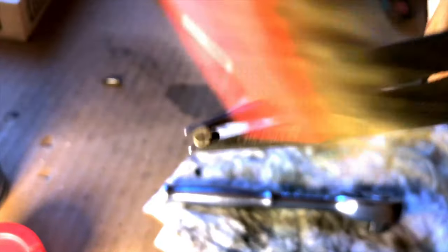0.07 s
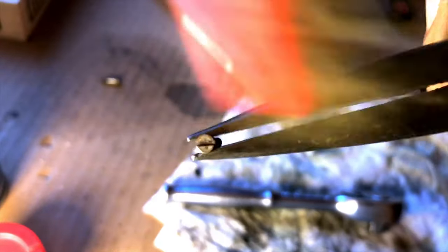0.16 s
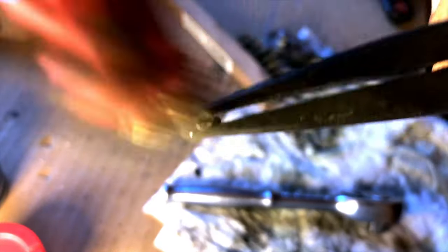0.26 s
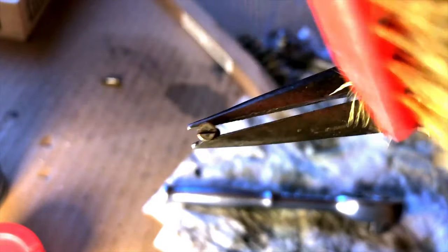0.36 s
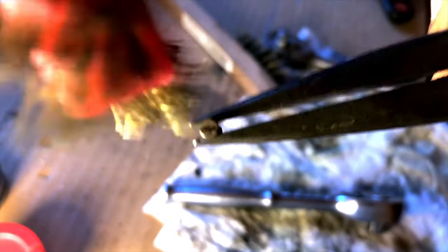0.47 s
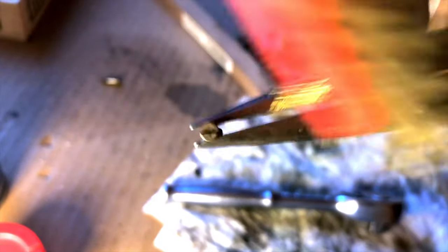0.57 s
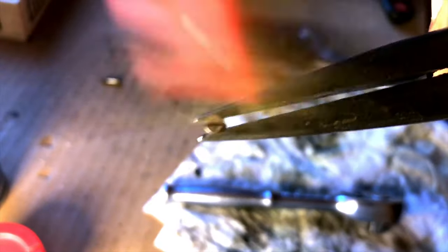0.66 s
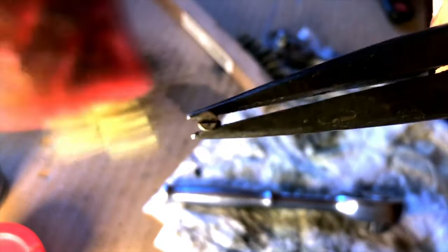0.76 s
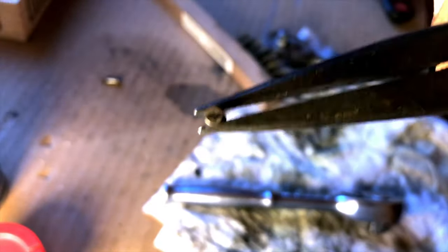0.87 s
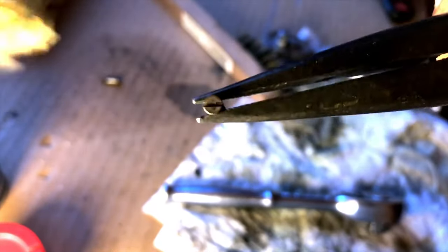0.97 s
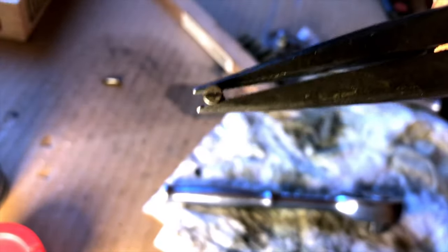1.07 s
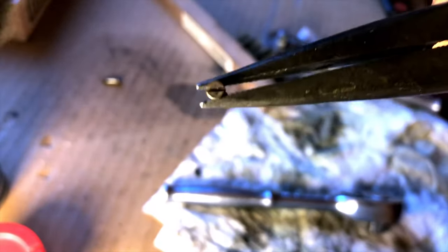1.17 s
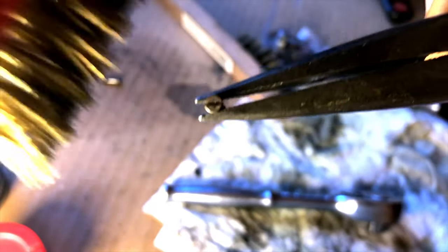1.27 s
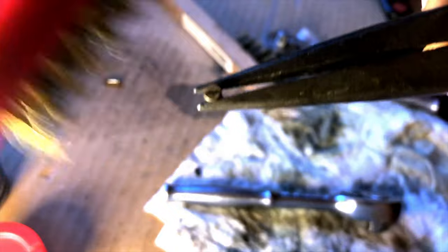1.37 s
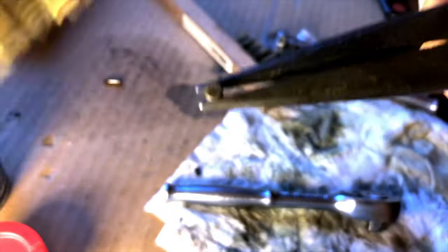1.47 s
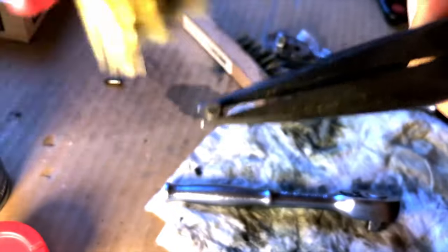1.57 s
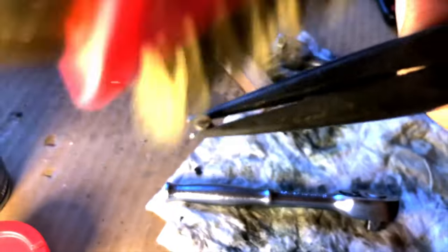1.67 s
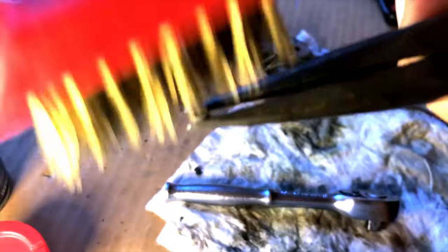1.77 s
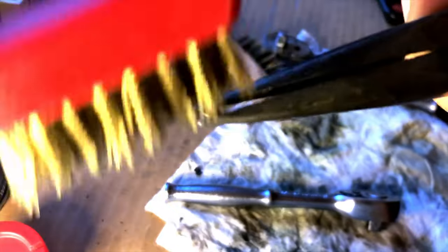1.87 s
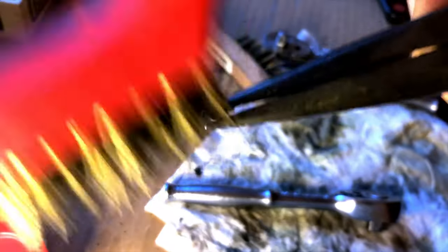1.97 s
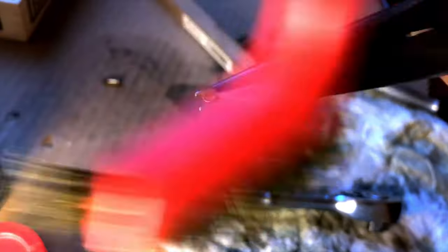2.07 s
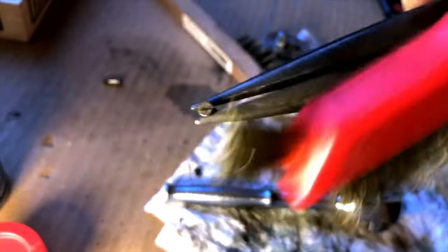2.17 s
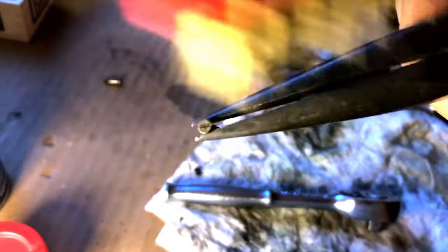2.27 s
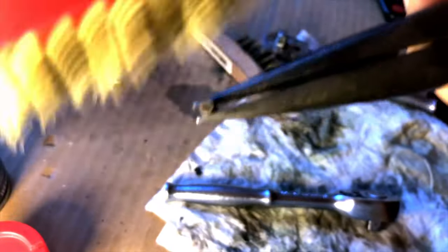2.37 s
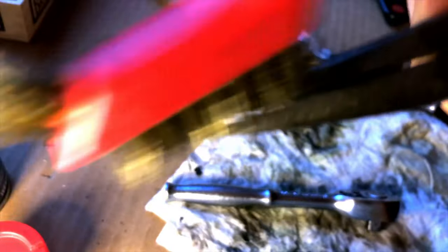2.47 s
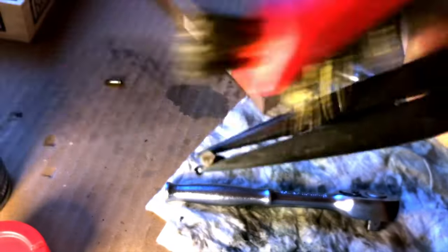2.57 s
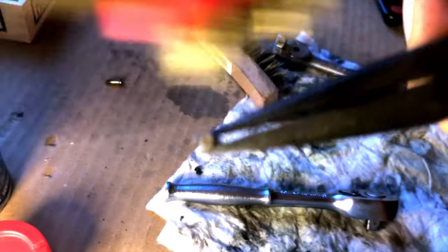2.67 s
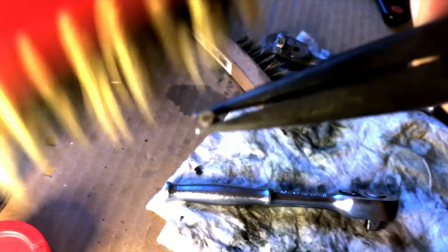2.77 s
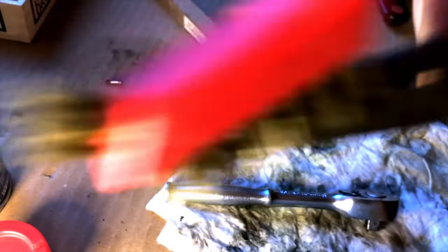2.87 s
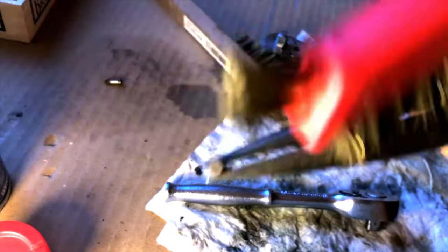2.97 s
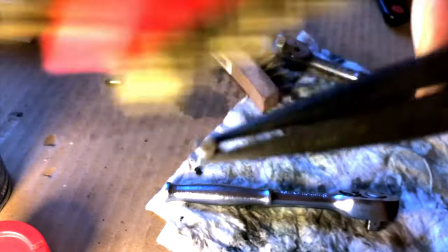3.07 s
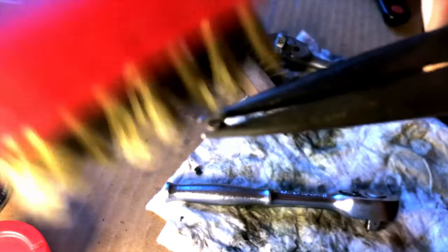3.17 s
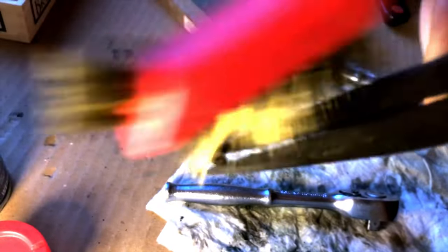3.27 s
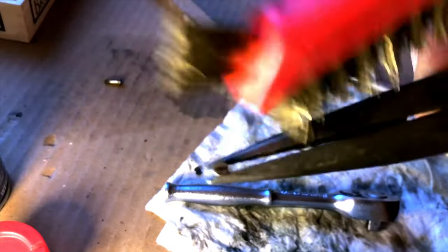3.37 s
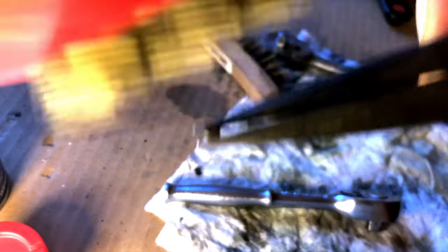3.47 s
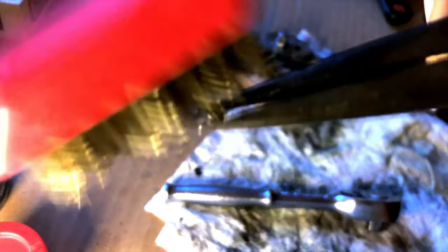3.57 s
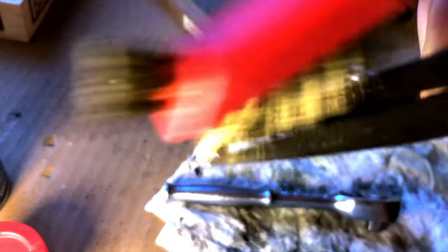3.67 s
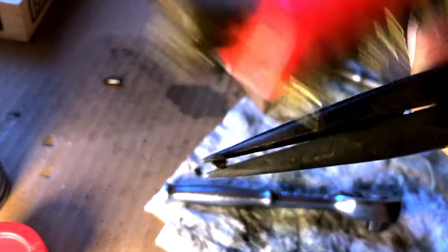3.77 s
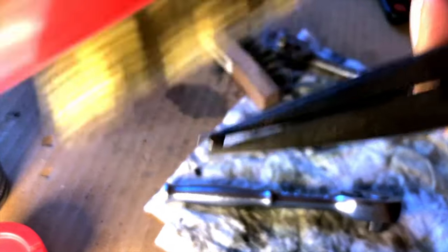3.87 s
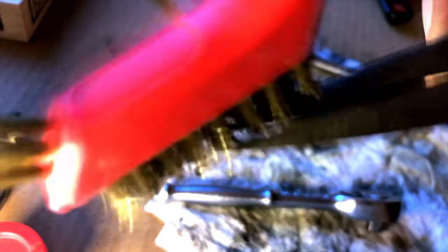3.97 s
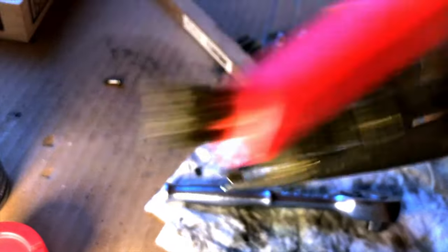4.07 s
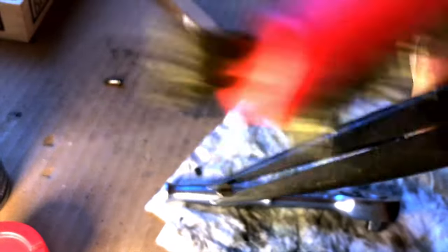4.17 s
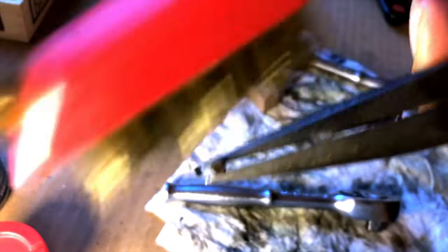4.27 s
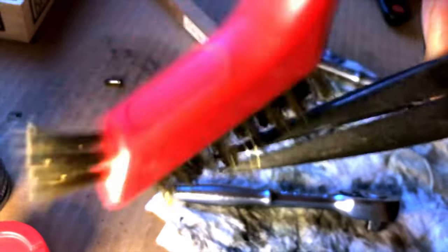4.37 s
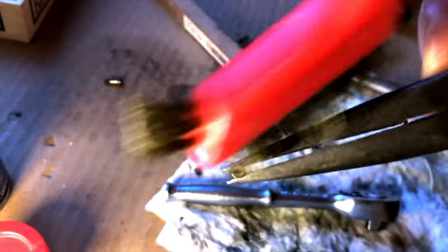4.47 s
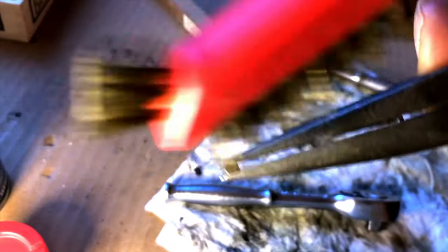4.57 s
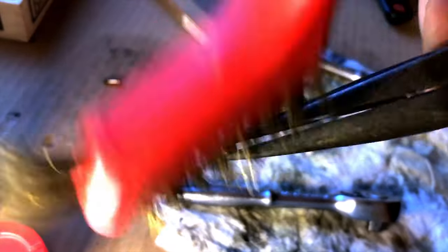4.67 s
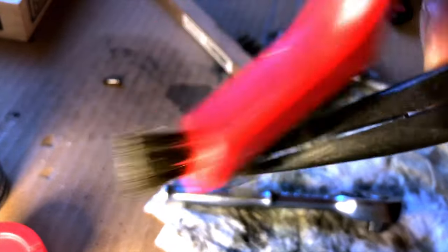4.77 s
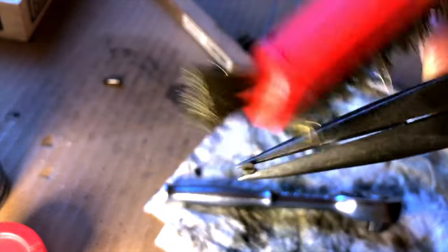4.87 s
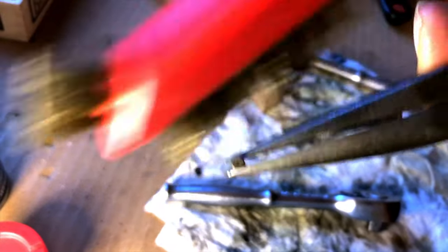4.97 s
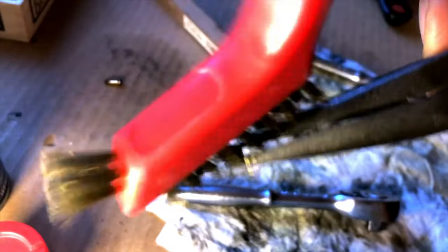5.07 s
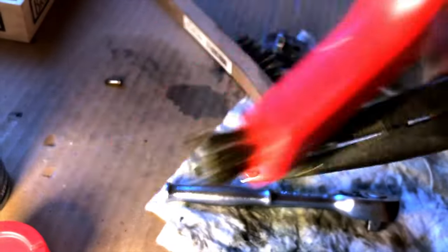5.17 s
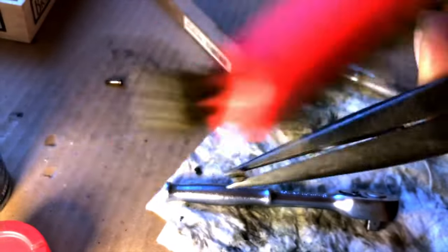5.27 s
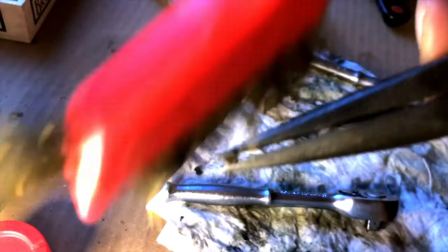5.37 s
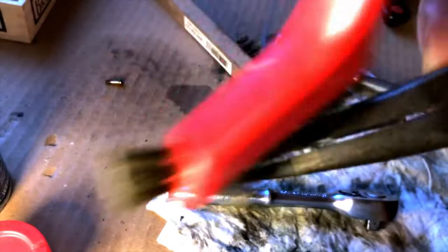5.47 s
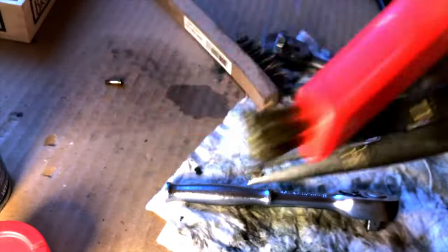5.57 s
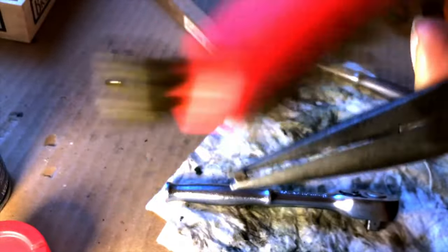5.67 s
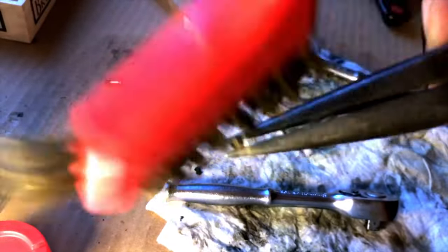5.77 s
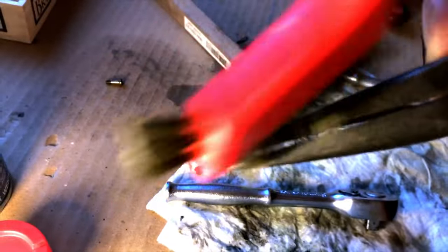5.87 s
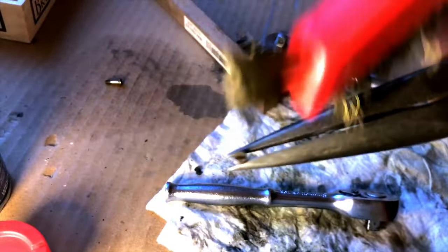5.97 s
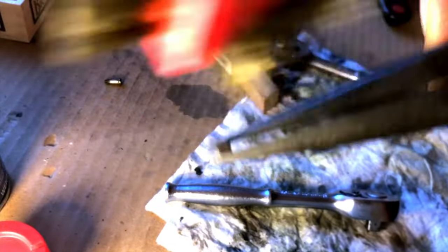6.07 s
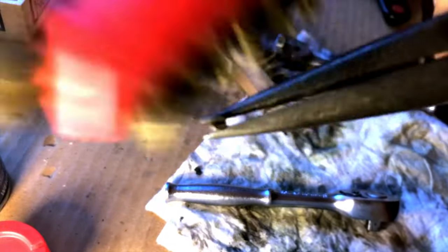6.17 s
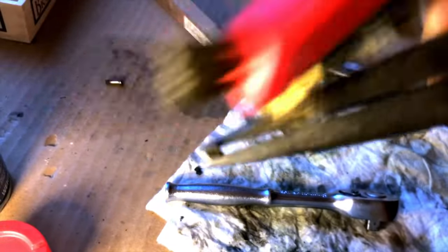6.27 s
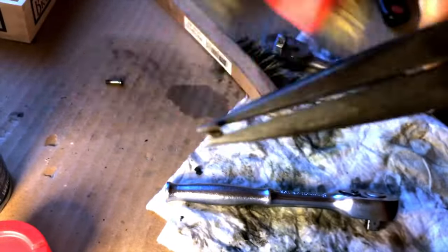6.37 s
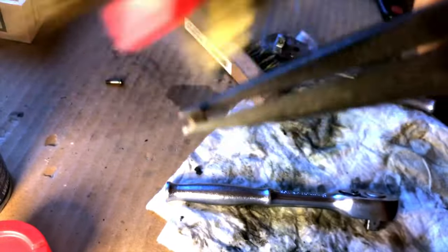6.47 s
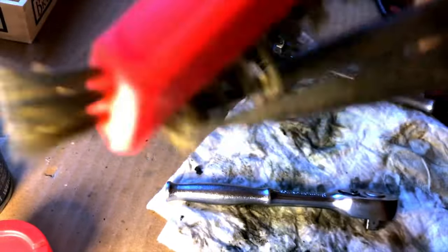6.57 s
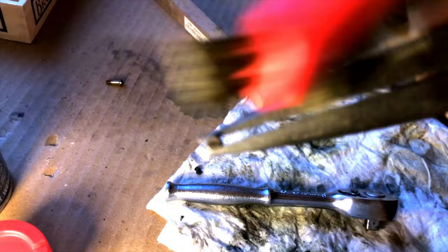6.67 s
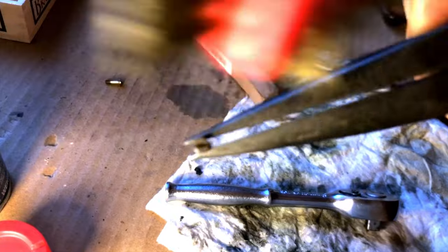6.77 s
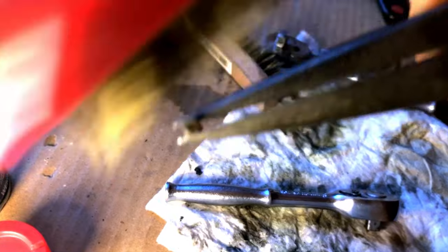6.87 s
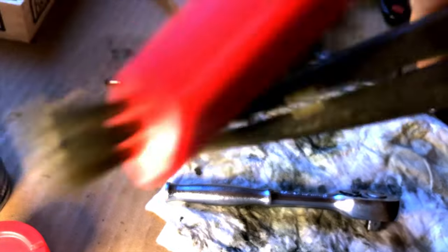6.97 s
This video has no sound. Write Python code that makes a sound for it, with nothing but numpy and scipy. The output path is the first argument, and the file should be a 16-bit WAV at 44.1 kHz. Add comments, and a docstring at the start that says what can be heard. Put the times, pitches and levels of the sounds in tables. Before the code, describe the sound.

Three short, dull-thudding wire scratches come about a quarter second apart. After a second of near quiet with soft swishes, the brush's hard head cracks against the pliers, slides briefly and bumps off. Then thirteen crisp, bright strokes follow at nearly three per second, with stray bristles flicking and pliers ringing slightly. Close dry microphone, little echo, weak low room rumble.

```python
"""Scratchy swipes of a small brass wire brush across a screw held in pliers, close by in a quiet workshop. Each
swipe is a slap of wire ticks, then a drag of ticks and pings; screw and pliers colour both, the hand thuds.
Stray tufts flick, and after a long rebound the brush lands a second time. The plastic brush head knocks on the
pliers (decaying modes), scrapes along them (filtered ticks) and bumps softly. Bristles rustle in faint swishes
over a low room rumble of filtered noise and a weak hum."""
import sys
import numpy as np
from scipy import signal
from scipy.fft import rfft, irfft, next_fast_len
from scipy.io import wavfile
from scipy.ndimage import uniform_filter1d, map_coordinates

SR = 44100
rng = np.random.default_rng(int(sys.argv[2]) if len(sys.argv) > 2 else 0)


def put_to_file(sound):
    """Save the sound as 16-bit audio at rate SR, in the file named by the first command-line argument."""
    columns = np.atleast_2d(sound).T  # one column per channel
    safe = np.clip(columns, -1, 1)
    whole_steps = np.round(safe * 32767)
    wavfile.write(sys.argv[1], SR, whole_steps.astype(np.int16))


N = 309582

# The brush head hits the pliers, then bumps softly as it slips off.
# Each row: start in seconds, level in dB, brightness in dB per octave above 2 kHz.
HEAD_KNOCKS = [(2.067, 0, -0.5), (2.1712, -23.5, -11)]


def amp(db):
    """Decibels to a linear factor."""
    return 10 ** (np.asarray(db) / 20)


def unit(x):
    """Scale a signal to rms 1."""
    return x / np.sqrt(np.mean(x ** 2) + 1e-20)


def clock(length):
    """Sample times over a length in seconds."""
    return np.arange(max(int(length * SR), 8)) / SR


def along(points, hz):
    """Interpolate (Hz, value) points on a log frequency axis."""
    point_hz, values = np.transpose(points)
    return np.interp(np.log(hz + 1), np.log(point_hz), values)


def brighter(hz, tilt_db):
    """A slope in dB per octave above 2 kHz, flat below."""
    return tilt_db * np.log2(np.maximum(hz, 2000) / 2000)


def wobble(size, rate):
    """A smooth random curve, rate knots a second."""
    knots = rng.standard_normal(int(size * rate / SR) + 4)
    return map_coordinates(knots, [np.arange(size) * rate / SR])


def add(track, s, x):
    """Mix x into the track at s seconds."""
    part = track[max(round(s * SR), 0):][:len(x)]
    part += x[:len(part)]


def colour(x, gain_db):
    """Causal minimum-phase filter with a given dB curve of frequency; keeps the energy of x."""
    size = 2 * next_fast_len(len(x) // 2 + 2048)
    cepstrum = irfft(np.log(amp(gain_db(np.fft.rfftfreq(size, 1 / SR)))))
    # folding the cepstrum onto positive times makes the filter causal
    cepstrum[1:size // 2] *= 2
    cepstrum[size // 2 + 1:] = 0
    y = irfft(rfft(x, size) * np.exp(rfft(cepstrum)))[:len(x)]
    return unit(y) * np.sqrt(np.mean(x ** 2))


def resonance(centre_hz, width_hz):
    """The dB curve of one damped mode."""
    def curve(f):
        response = f * width_hz / (centre_hz ** 2 - f ** 2 + 1j * f * width_hz)
        return 20 * np.log10(np.abs(response) + 1e-6)
    return curve


def ticks(size, rate, spread_db):
    """Many tiny contacts at random moments and of random strength, rms 1."""
    hits = np.sqrt(rng.poisson(rate / SR, size))
    strength = amp(spread_db * rng.standard_normal(size))
    return unit(hits * rng.choice([-1, 1], size) * strength)


def swipes():
    """The first bristles slap the screw and rebound; then the brush drags across it and pushes the hand."""
    # Each row: start in seconds, slap level in dB, ring of the pliers in dB relative to the slap,
    # rebound in seconds, end of pressing and end of swipe in seconds after the start, drag level in dB,
    # drag brightness in dB per octave, thud level in dB. Levels are faders ahead of each sound's own trims.
    strokes = [(0.07, -33, -9, .005, 0.048, 0.076, -38, -1, -33),
               (0.3051, -28, -14.5, 0.0028, 0.047, 0.078, -37, 0, -35),
               (0.538, -29, -27, .005, 0.03, 0.1, -37.5, -0.5, -38.5),
               (2.444, -30, -7, 0.01, 0.081, 0.1671, -41, 1.5, -50.5),
               (2.848, -26, 1, 0.0084, 0.0582, 0.13, -39.5, -1, -46),
               (3.224, -28, -4.5, 0.0087, .1, .14, -40.5, 1.3, -51),
               (3.588, -30.5, -0.5, 0.0063, 0.12, 0.17, -38.5, 2.5, -49),
               (3.9797, -19.5, -1.5, 0.0065, 0.095, 0.15, -38, 1.2, -42),
               (4.385, -29.5, -5, .022, .095, 0.12, -40.5, 3, -59),
               (4.7089, -24, -2, .003, .11, 0.1614, -41, 1.3, -38),
               (5.0783, -21.5, -8, .008, 0.091, .16, -38.5, 2.5, -40),
               (5.4365, -21.5, -11, .008, 0.097, .18, -39.5, 2, -40.5),
               (5.8105, -23.5, -12, 0.00674, 0.098, 0.18, -40, 2.5, -45),
               (6.204, -32, -13, 0.0067, 0.14, 0.17, -44.5, 2.5, -53),
               (6.5695, -25, -5.5, .022, 0.068, 0.15, -40, 3, -43.5),
               (6.939, -23.5, -6.5, 0.0086, 0.092, 0.16, -39.5, 3.5, -38.5)]
    slap_s, slap_tilt_db = .005, 1.12  # the slap is brighter than the drag by this many dB per octave
    out = np.zeros(N)
    for s, slap_db, ring_db, rebound, press, length, drag_db, tilt_db, thud_db in strokes:
        slap = tuft(slap_s, tilt_db + slap_tilt_db, ring_db)
        stroke = drag(press - rebound, length - rebound, tilt_db)
        add(out, s, amp(slap_db) * slap)
        add(out, s + rebound, amp(drag_db) * stroke)
        add(out, s + rebound, amp(thud_db) * thud(hz=169.3, width_hz=156, t60=0.26))
    return out


def tuft(length, tilt_db, ring_db, rate=16000, spread_db=2, trim_db=-1.0, quiver_db=-15, quiver_t60=0.05):
    """A tuft lands within a few milliseconds: a tight burst of wire ticks, then the wires quiver."""
    t = clock(.04)
    landing = np.sqrt(np.abs(np.sin(np.pi * np.minimum(t / length, 1))))
    quiver = amp(quiver_db - 60 * np.abs(t - length) / quiver_t60)
    force = unit((landing + quiver) * ticks(len(t), rate, spread_db))
    force *= np.sqrt(length / t[-1])  # longer landings carry more energy
    return amp(trim_db) * on_metal(force, tilt_db, ring_db)


def drag(press, length, tilt_db, flutter_db=1.88, flutter_rate=220, lurch_db=1, lurch_rate=55):
    """The bristles grip, hold while the hand presses, then thin out as the brush leaves the screw."""
    grip_s, grip_rise_db = 0.018, 5.5  # it starts weak and grips
    ease_db, lift_db_per_s = 13.5, 904  # it weakens as the hand eases, then lifts off
    t = clock(length + .045)
    gripping_db = grip_rise_db * np.maximum(1 - t / grip_s, 0)
    easing_db = ease_db * np.clip((t - press) / (length - press), 0, 1)
    lifting_db = lift_db_per_s * np.maximum(t - length, 0)
    # single wires flutter quickly, whole tufts lurch more slowly
    uneven_db = flutter_db * wobble(len(t), flutter_rate) + lurch_db * wobble(len(t), lurch_rate)
    level_db = uneven_db - gripping_db - easing_db - lifting_db
    return amp(level_db) * scrape(t, tilt_db, ring_db=-11.5)


def scrape(t, tilt_db, ring_db, grain_db=4.5, coarsening=0.82, count=4):
    """One row of bristles after another takes over, each with its own colour."""
    turn = t / t[-1] * (count - 1)
    spread_db = grain_db - coarsening * tilt_db  # tips that dig in sound both duller and more crackly
    out = np.zeros(len(t))
    for row in range(count):
        handover = np.cos(np.pi / 2 * np.clip(turn - row, -1, 1))
        wires = unit(ticks(len(t), 16000, spread_db) + amp(-7) * pings(len(t)))
        out += handover * on_metal(wires, tilt_db, ring_db)
    return out


def pings(size, rate=600, pitch_hz=8500, spread=.33):
    """Single wires slip off an edge and ring briefly, each at its own pitch; rms 1."""
    count = int(rate * size / SR) + 1
    t, t60, spread_db = clock(.018), .024, 2.5
    start = rng.integers(0, size, (count, 1))
    pitch, strength = rng.standard_normal((2, count, 1))
    hz = np.minimum(pitch_hz * np.exp(spread * pitch), SR / 2)
    wires = amp(spread_db * strength - 60 * t / t60) * np.sin(2 * np.pi * hz * t)
    moments = start + np.arange(len(t))
    return unit(np.bincount(moments.ravel(), wires.ravel())[:size])  # sums overlapping pings


def on_metal(force, tilt_db, ring_db, vary_db=3.0, detune=.015, grip_detune=0.028):
    """Bristle force heard through the pliers; every contact point stirs their modes a little differently."""
    # Wire on metal. Each row: frequency in Hz, relative spectrum level in dB.
    wire_curve = [(100, 3), (600, -7.5), (1100, 6.5), (2000, 4), (3500, -1), (4900, -1.5), (7000, -0.5),
                  (9000, -2), (11000, -1), (12500, -3), (15500, -2.5)]
    # Resonances of screw and jaws. Each row: centre in Hz, width in Hz, lift in dB, before random variation.
    jaw_modes = [(2720, 530, 3.5), (3310, 340, 2.5), (4164, 465, 9), (5770, 650, 5.5), (6560, 380, 2),
                 (8095, 460, 7.5), (9700, 430, 7.5), (10480, 490, 4.5), (11630, 490, 5)]
    # Bending of the two arms of the pliers. Each row: centre in Hz before the grip shifts it,
    # width in Hz of the mode before it is cubed, relative level in dB.
    arm_modes = [(1195, 316, -3), (1403, 220, 4.5)]
    chance = rng.standard_normal((len(jaw_modes), 2))
    grip = 1 + grip_detune * rng.uniform(-1, 1)  # the squeeze of the hand shifts the pitch of the arms

    def jaws(f):
        curve_db = along(wire_curve, f) + brighter(f, tilt_db)
        for (hz, width, db), (lift, shift) in zip(jaw_modes, chance):
            offset = 2 * (f - hz * (1 + detune * shift)) / width
            curve_db = curve_db + (db + vary_db * lift) / (1 + offset ** 2)
        return curve_db

    def arms(f):
        # three times the dB curve cubes the response: narrow peaks with steep skirts
        total = sum(amp(db + 3 * resonance(hz * grip, width)(f)) for hz, width, db in arm_modes)
        return 20 * np.log10(total + 1e-4)

    return colour(force, jaws) + amp(ring_db) * colour(force, arms)


def thud(hz, width_hz, t60, level_db=1.5, push_db=9, push_hz=215, push_s=0.0025):
    """The hand holding the pliers takes up the blow: one soft, damped push and a dull, dying shudder."""
    t = clock(0.12)
    mode = resonance(hz, width_hz)
    shudder = colour(rng.standard_normal(len(t)), lambda f: 2 * mode(f))  # the mode, squared
    push = t / push_s * np.exp(1 - t / push_s) * np.sin(2 * np.pi * push_hz * t)
    return shudder * amp(level_db - 60 * t / t60) + amp(push_db) * push


def flicks():
    """Stray tufts catch on the metal or the fingers and spring free; after a long rebound the brush lands a
    second time."""
    # Each row: start in seconds, length in seconds, fader level in dB, brightness in dB per octave. # The rows
    # at 4.41 s and 6.603 s are the brush landing again after a long rebound.
    stray_tufts = [(0.134, 0.00313, -36.5, 2), (0.392, 0.028, -50, 1), (0.5302, 0.0048, -38, 1),
                   (0.7858, 0.0021, -55.5, 0), (0.9462, 0.00323, -53, -4.5), (1.35, 0.0077, -51, -7.5),
                   (2.002, .003, -43.5, 6), (2.009, 0.0085, -46, 3), (2.215, .0065, -52, 0),
                   (2.844, 0.00225, -34.5, -4.5), (4.41, .004, -36, 6), (6.239, 0.0079, -37, 4.5),
                   (6.296, 0.0098, -37.5, 5), (6.327, 0.0071, -39, 4.5), (6.603, .004, -35, 7)]
    out = np.zeros(N)
    for s, length, db, tilt_db in stray_tufts:
        add(out, s, amp(db) * tuft(length, tilt_db, ring_db=-16.5))
    return out


def knock(crack_db=-19, crack_t60=0.013, attack=0.000073):
    """The hard brush head strikes the pliers and rings briefly; a softer blow is duller."""
    # Modes of the knock. Each row: frequency in Hz, relative level in dB, 60 dB decay time in seconds.
    head_modes = [(150, -33, .04), (320, -16, 0.025), (946, -8.5, 0.0054), (1303.9, -6.5, 0.011),
                  (1660, -12.5, 0.013), (2020, -11.5, 0.011), (3100, 0, 0.0046), (4020, -5.5, .006),
                  (5900, -12.5, 0.0062), (6660, -20.5, 0.0086), (7250, -15.5, 0.0085), (8300, -22.5, 0.006),
                  (9777, -24, 0.014)]
    out, t = np.zeros(N), clock(.08)
    ring = np.zeros(len(t))
    for k, (hz, db, t60) in enumerate(head_modes):
        ring += (-1) ** k * amp(db - 60 * t / t60) * np.sin(2 * np.pi * hz * t)
    for s, db, tilt_db in HEAD_KNOCKS:
        noise = uniform_filter1d(rng.standard_normal(len(t)), size=2)
        crack = amp(crack_db - 60 * t / crack_t60) * noise
        blow = (ring + crack) * (1 - np.exp(-t / attack))
        add(out, s, amp(db) * colour(blow, lambda f: brighter(f, tilt_db)))
    return out


def slide(judder_db=2.5, judder_rate=190):
    """From the first knock to the second the plastic head sticks and slips along the steel."""
    # Plastic sliding on steel. Each row: frequency in Hz, relative spectrum level in dB.
    plastic_curve = [(200, -33), (600, -19.5), (950, -8.5), (1300, 1), (1550, -7), (1900, -10.5),
                     (2600, -15), (5400, -27), (10000, -38.5), (16000, -44.5)]
    level_db, swell_db = -35, 9  # swell_db is the depth of both swell and fade
    attack_s, release_s = .036, .02
    out, start, end = np.zeros(N), HEAD_KNOCKS[0][0], HEAD_KNOCKS[-1][0]
    t = clock(2 * (end - start))
    swelling = np.maximum(1 - t / attack_s, 0)
    fading = np.maximum(1 + (start + t - end) / release_s, 0)  # keeps falling past the end
    pressure_db = level_db - swell_db * (swelling + fading) + judder_db * wobble(len(t), judder_rate)
    friction = amp(pressure_db) * ticks(len(t), rate=10000, spread_db=2.5)
    add(out, start, colour(friction, lambda f: along(plastic_curve, f)))
    return out


def rustle():
    """Fingers shift on the handle and loose bristles graze the pliers: each swish is a bell curve of ticks."""
    # Soft swishes of the brush turned in the hand, then of bristles grazing the pliers.
    # Each row: peak in seconds, length in seconds, relative level in dB, brightness in dB per octave.
    soft_swishes = [(0.832, 0.0344, -63, 0), (1.203, 0.056, -65.5, 1), (1.381, 0.057, -62.5, -3),
                    (1.493, 0.061, -53.5, 0), (1.598, 0.041, -56, 1.5), (2.057, 0.039, -52, -1),
                    (2.195, 0.036, -52, -3)]
    # Loose bristles. Each row: frequency in Hz, relative spectrum level in dB.
    bristle_curve = [(500, -10.5), (2500, -0.5), (5000, -7), (8800, -6), (11300, 1.5), (13000, -4.5),
                     (16000, -5)]
    out, t = np.zeros(N), clock(.3)
    middle = t[-1] / 2
    for s, length, db, tilt_db in soft_swishes:
        bell = np.exp(-2 * ((t - middle) / length) ** 2)
        touch = bell * ticks(len(t), rate=7000, spread_db=4)
        swish = colour(touch, lambda f: along(bristle_curve, f) + brighter(f, tilt_db))
        add(out, s - middle, amp(db) * swish)
    return out


def workshop(level_db=-43, waver_db=1, hum_hz=63, hum_db=-65):
    """A low rumble of filtered noise, its level wavering slightly, with a weak hum of wavering phase."""
    # The workshop. Each row: frequency in Hz, relative spectrum level in dB.
    room_curve = [(22, -38.5), (42, -16.5), (90, -17.5), (150, 1.5), (220, -2), (330, -7), (480, -20),
                  (700, -25.5), (1250, -18), (1900, -31), (3000, -38.5), (6000, -46.5), (11000, -50),
                  (16000, -55.5)]
    rumble = colour(rng.standard_normal(N), lambda f: along(room_curve, f))
    phase = 2 * np.pi * hum_hz * np.arange(N) / SR + wobble(N, rate=6.6)
    hum = np.sqrt(2) * np.sin(phase)
    return amp(level_db + waver_db * wobble(N, rate=14)) * rumble + amp(hum_db) * hum


def scene():
    """Brush, pliers and room at one close microphone."""
    return (swipes() + flicks() + knock() + slide() + rustle() + workshop())[None]


def record(dry, low_cut_hz=36, top_hz=15850):
    """The recorder thins the deepest bass, clips at full scale and cuts steeply above its band limit."""
    high_pass = signal.butter(2, low_cut_hz, "highpass", fs=SR, output="sos")
    thinned = signal.sosfilt(high_pass, dry)
    size = next_fast_len(N + SR // 2)
    hz = np.fft.rfftfreq(size, 1 / SR)
    lowpass = 1 / (1 + (hz / top_hz) ** 160)
    return irfft(rfft(np.clip(thinned, -1, 1), size) * lowpass, size)[:, :N]


dry = scene()
out = record(dry)
put_to_file(out)
```